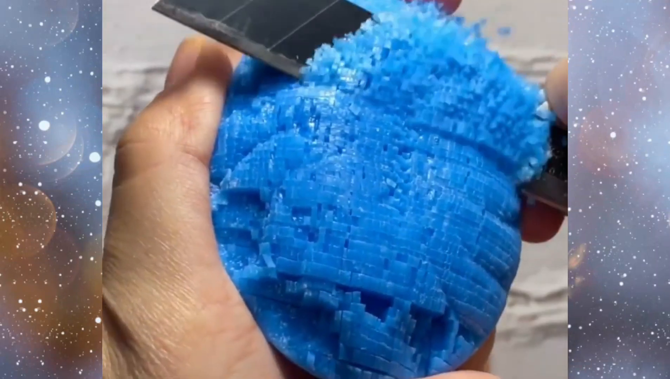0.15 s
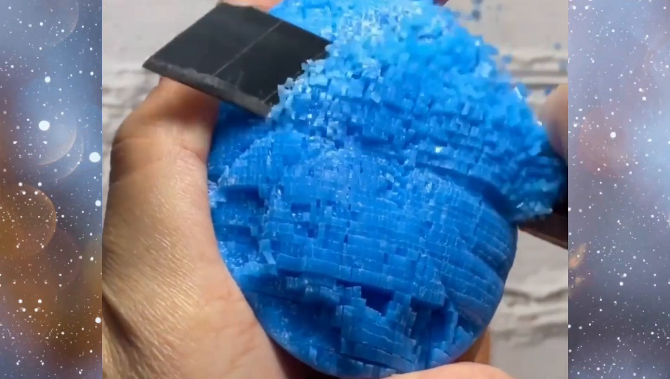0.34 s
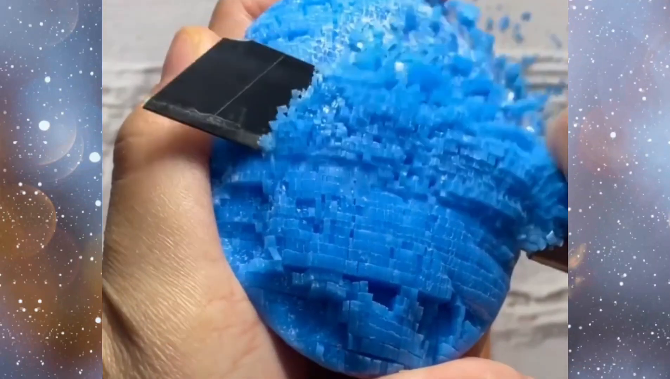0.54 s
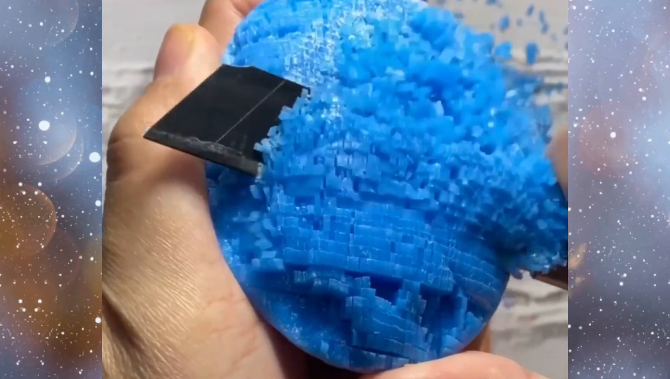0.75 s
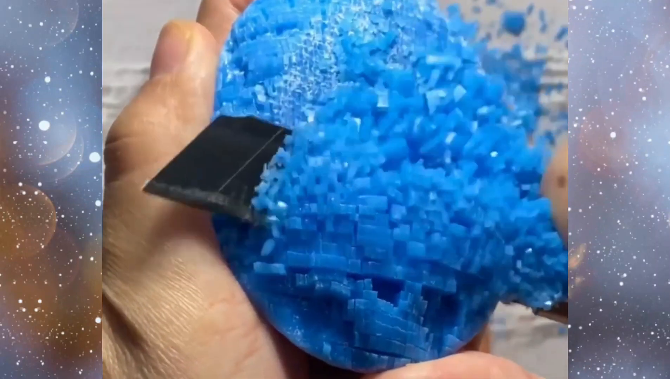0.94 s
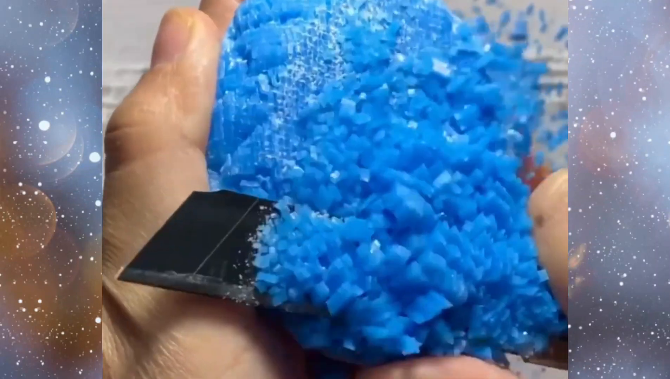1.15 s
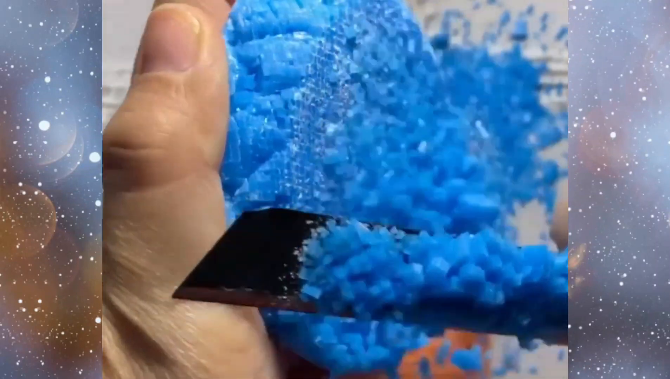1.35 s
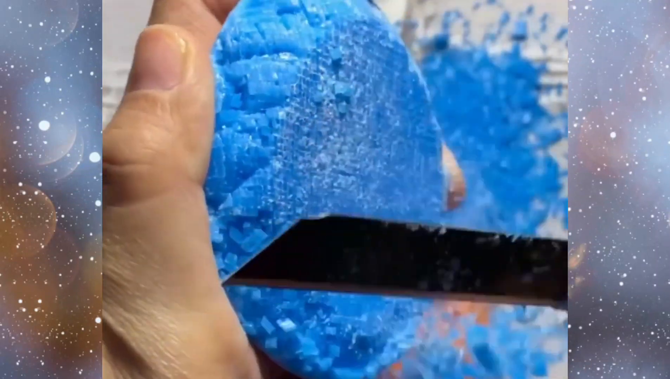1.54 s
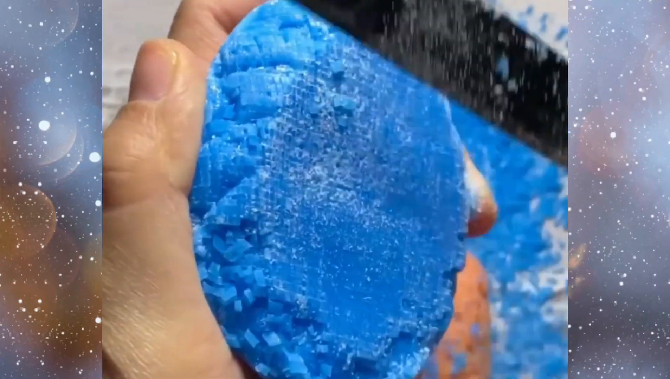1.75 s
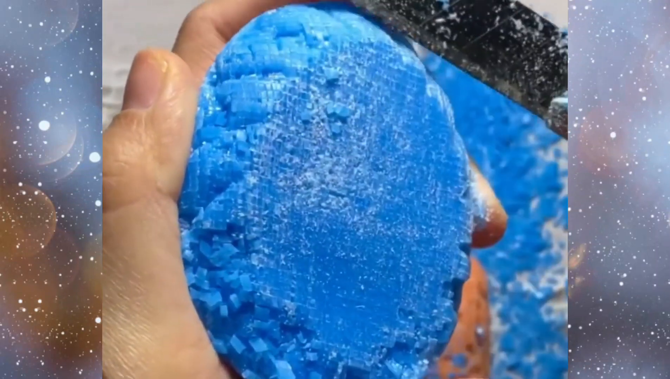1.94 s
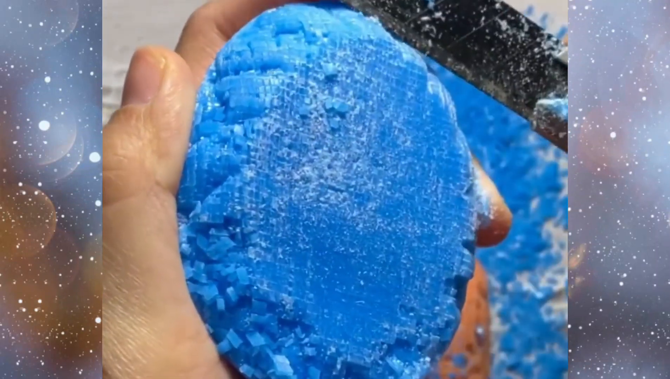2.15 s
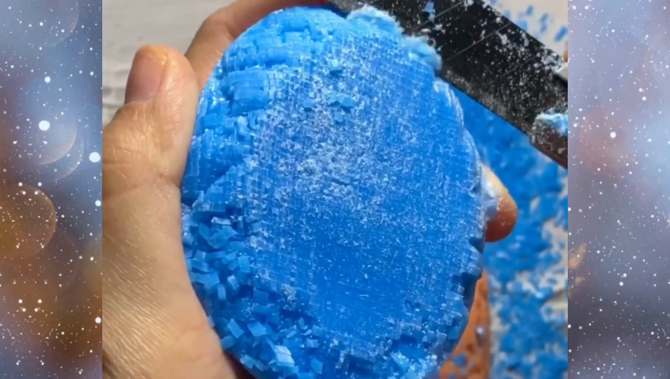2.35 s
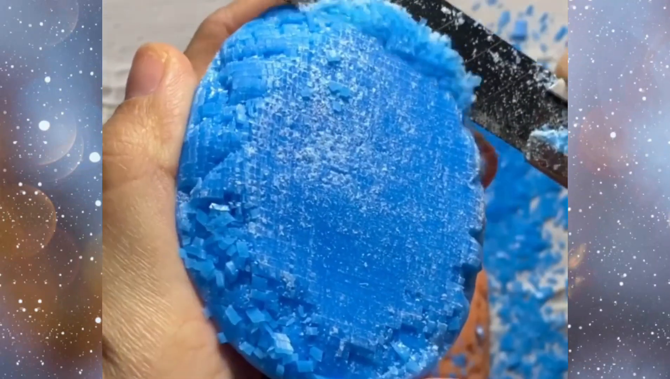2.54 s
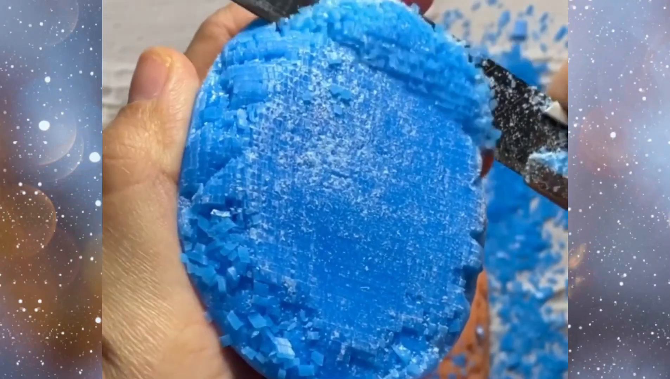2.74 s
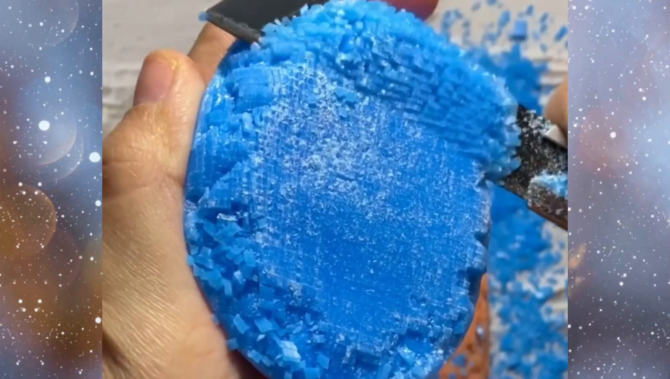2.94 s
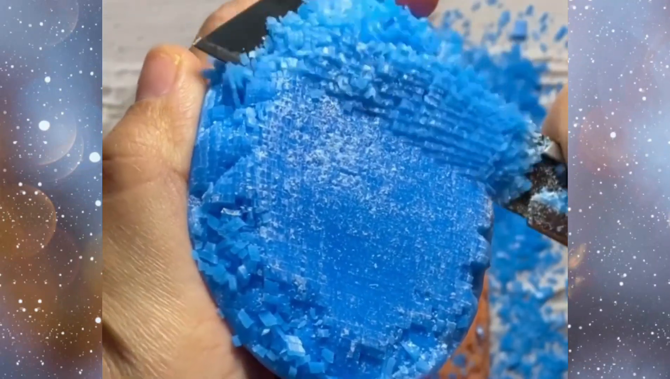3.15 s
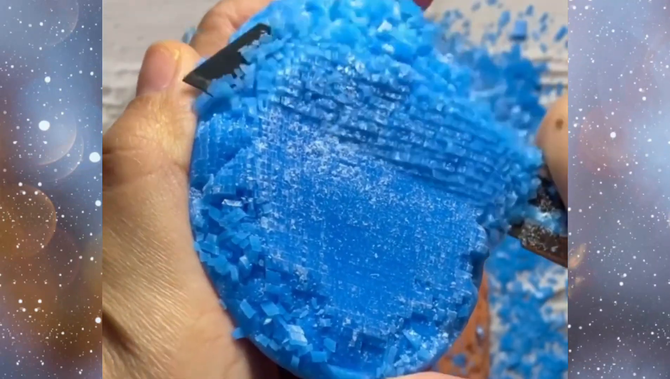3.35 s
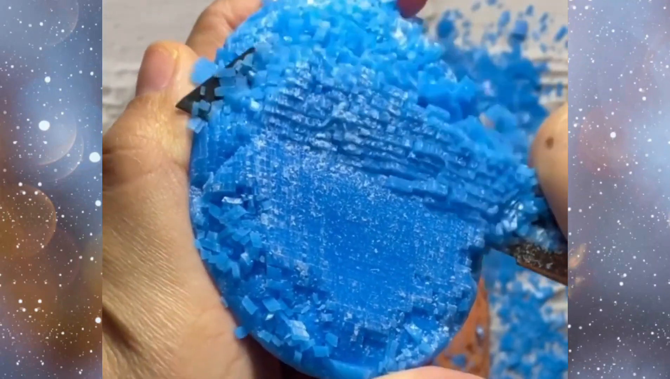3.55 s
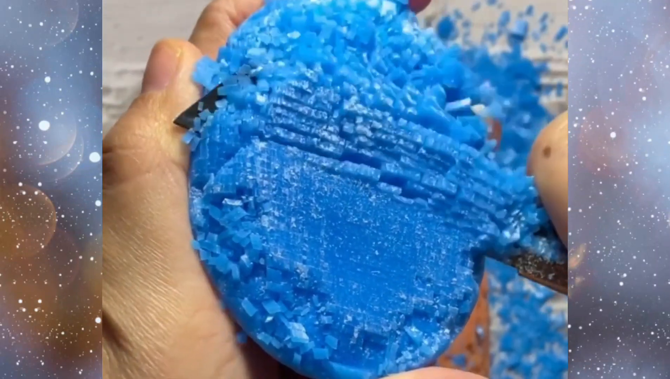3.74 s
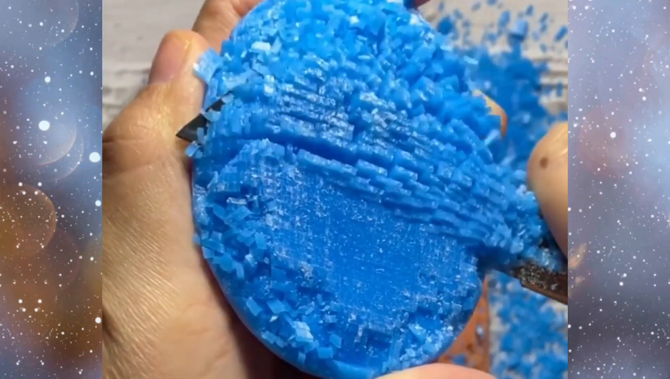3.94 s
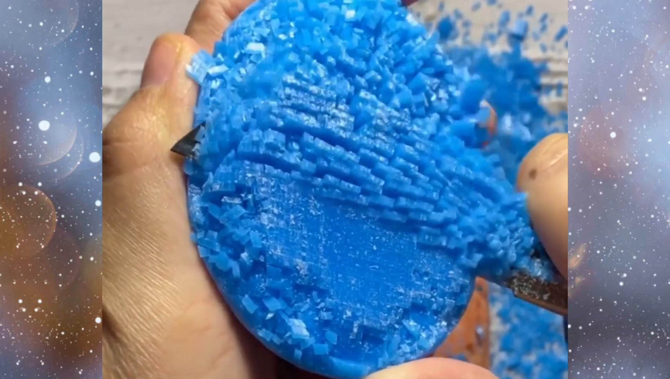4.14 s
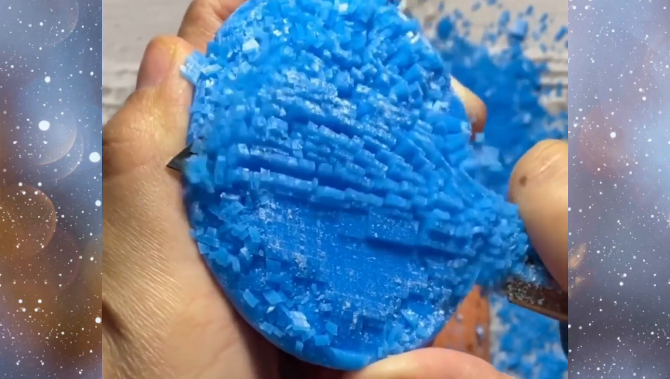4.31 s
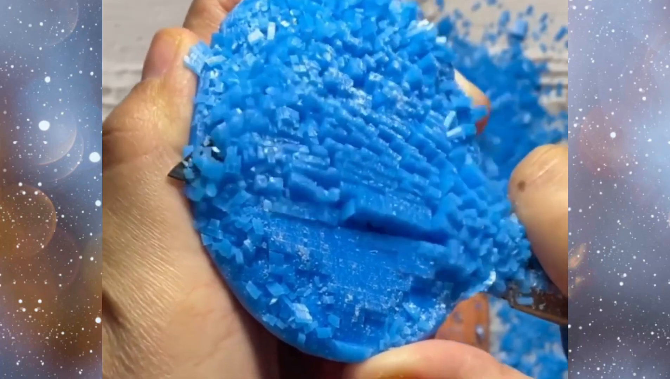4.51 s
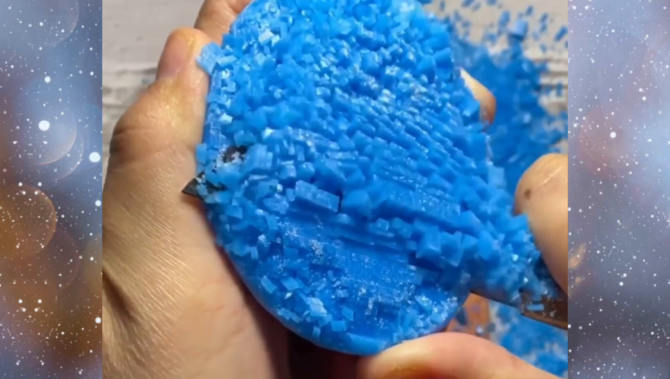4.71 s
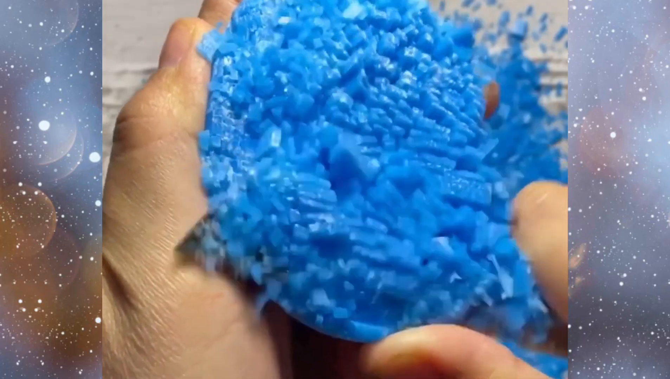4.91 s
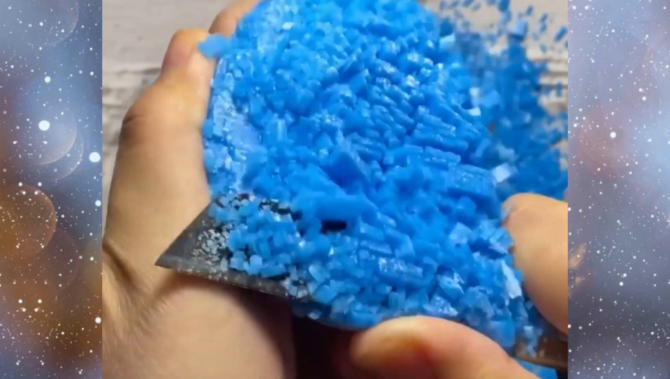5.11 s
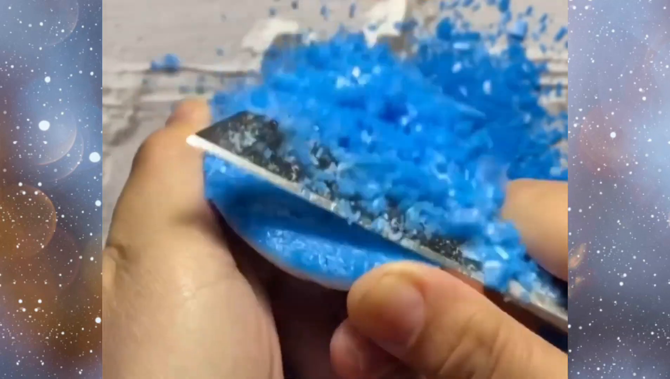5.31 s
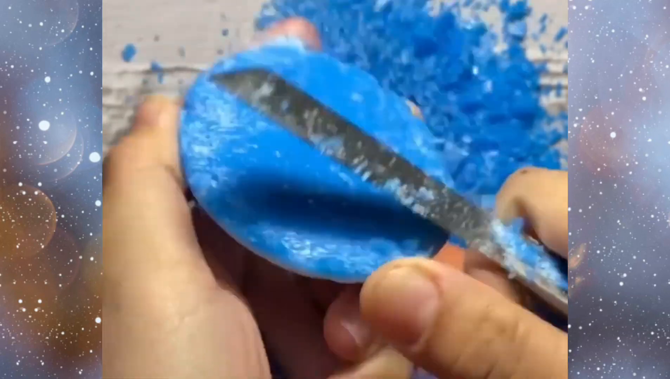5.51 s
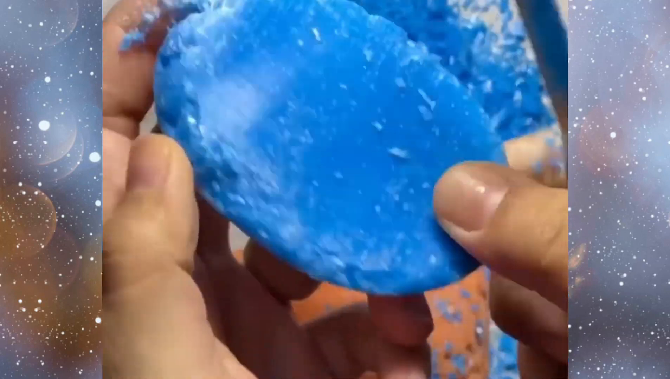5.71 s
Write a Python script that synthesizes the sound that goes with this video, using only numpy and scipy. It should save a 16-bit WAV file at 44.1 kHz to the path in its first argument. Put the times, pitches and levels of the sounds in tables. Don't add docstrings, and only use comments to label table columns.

```python
import sys
import numpy as np
from scipy import signal
from scipy.fft import rfft, irfft
from scipy.io import wavfile
from scipy.ndimage import uniform_filter1d

SR = 44100
rng = np.random.default_rng(int(sys.argv[2]) if len(sys.argv) > 2 else 0)


def log_audio(samples):
    frames = np.atleast_2d(samples).T
    limited = np.clip(frames, -1, 1)
    pcm = np.round(limited * 32767).astype(np.int16)
    wavfile.write(sys.argv[1], SR, pcm)


def voltage_ratio(level):
    return 10 ** (np.asarray(level, float) / 20)


N = 258867
TIME = np.arange(N) / SR
SPILL_MID_DB = -31
PLACE_SPREAD_DB = 7
KNOCK_LEFT_DB = 3.5


def evened(x):
    return x / np.sqrt(np.mean(x ** 2) + 1e-20)


def read(points, hz):
    f, value = np.transpose(points)
    return np.interp(np.log(hz + 1), np.log(f + 1), value)


def during(spans):
    sink_s = 0.09
    return sum(np.clip(np.minimum(TIME - start, end - TIME) / sink_s + .5, 0, 1) for start, end in spans)


def leaning(db):
    return voltage_ratio(np.array([[db], [-db]]) / 2)


def decaying(x, ms):
    return signal.lfilter([1], [1, -np.exp(-1000 / (ms * SR))], x)


def ring(x, hz, width):
    r = np.exp(-np.pi * width / SR)
    return 2 * signal.lfilter([1 - r], [1, -r * np.exp(2j * np.pi * hz / SR)], x + 1e-18).real


def resonate(x, hz, width):
    turn = np.exp(2j * np.pi * np.cumsum(hz) / SR)
    r = np.exp(-np.pi * width / SR)
    return 2 * (turn * signal.lfilter([1 - r], [1, -r], x / turn + 1e-18)).real


def body(x, modes):
    return sum((-1) ** k * voltage_ratio(db) * ring(x, hz, width) for k, (hz, width, db) in enumerate(modes))


# f/Hz, width/Hz, level/dB
MOTOR_LINES = [(61.05, 2.5, -53), (118.8, 8.1, -53), (191.4, 52, -53.5), (296.3, 13, -56)]
# f/Hz, density/dB
AIR_COLOUR = [(12, -69.5), (20, -53.5), (43, -16.5), (68, -14), (87, -21), (123, -12.5), (148, -18),
              (305, -23), (549, -21.5), (595, -26), (777, -21), (1300, -27), (2200, -30.5), (6940, -42.5),
              (11800, -60), (15400, -106), (22000, -120)]
# f/Hz, likeness/1
AIR_LIKENESS = [(30, 0.92), (120, 1), (250, 0.047), (1000, 0.053)]
# from/s, until/s
DIMMED = [
    (-.1, .3),
    (2.08, 3.15),
]


def room_air(spill_db):
    hz = np.fft.rfftfreq(N, 1 / SR)
    same = np.clip(read(AIR_LIKENESS, hz), 0, 1)
    left, other = rfft(rng.standard_normal((2, N)))
    right = same * left + np.sqrt(1 - same ** 2) * other
    air = irfft(np.array([left, right]) * voltage_ratio(read(AIR_COLOUR, hz)), N)
    air = voltage_ratio(-50) * evened(air) * leaning(2.4)
    air = air * voltage_ratio(-5.5 * np.exp(-((TIME - 2.33) / 0.15) ** 4))
    high_pass = signal.butter(4, 600, "high", fs=SR, output="sos")
    upper = signal.sosfilt(high_pass, air[:, ::-1])[:, ::-1]
    upper = signal.sosfilt(high_pass, upper)
    air = air - (1 - voltage_ratio(-9)) * during(DIMMED) * upper
    noise = rng.standard_normal(N)
    lines = sum(voltage_ratio(db) * evened(ring(ring(noise, f, width), f, width)) for f, width, db in MOTOR_LINES)
    swell_db = 9.5 + 0.084 * (uniform_filter1d(spill_db, SR // 8) - SPILL_MID_DB)
    return voltage_ratio(swell_db) * (air + lines * voltage_ratio(-5.5) * leaning(1.2))


# f/Hz, t60/s
NEAR_DECAY = [(500, 0.073), (2000, 0.075), (6000, 0.094), (12000, 0.051)]


def surfaces(x):
    taps = np.zeros((3, 4096))
    slots = np.arange(40, 4070, 12)
    at = slots + rng.integers(0, 12, (3, len(slots)))
    np.put_along_axis(taps, at, rng.choice([-1., 1.], at.shape), 1)
    hz, t, z = signal.stft(taps, SR, nperseg=64)
    apart = np.clip(hz / 7000, 0, 1)[:, None]
    z = np.sqrt(1 - apart ** 2) * z[0] + apart * z[1:]
    decay = voltage_ratio(-60 * t / read(NEAR_DECAY, hz)[:, None])
    tail = signal.istft(z * decay, SR, nperseg=64)[1]
    return signal.oaconvolve(x, tail / np.linalg.norm(tail[0]), axes=1)[:, :N]


# t/s, cutting level/dB, crumbs riding the blade level/dB, crumbs spilling level/dB, stick f/Hz
HAND_STROKES = [
    [(0.0, -20, -36, -32.5, 7700), (0.266, -24.5, -36, -36, 7600), (0.34, -11, -14.5, -28.5, 7250),
     (0.52, -8.5, -10, -28, 7340), (1.16, -15.5, -20.5, -22.5, 6840), (1.64, -12, -18, -22.5, 5370),
     (1.894, -13.5, -15.5, -25.5, 5750), (2.04, -31, -28, -38, 5630), (2.088, -43, -35.5, -68.5, 5570)],
    [(2.384, -70.5, -63, -69, 6960), (2.636, -25, -45, -33.5, 7070), (2.95, -19, -50, -39.5, 7800),
     (3.244, -15, -37, -30.5, 7300), (3.642, -16, -32.5, -29, 7760), (3.9, -26.5, -33, -31.5, 7250),
     (4.052, -23.5, -43, -35, 8300), (4.75, -33, -41, -39.5, 6320), (5.132, -23, -30, -28.5, 7070)],
    [(5.44, -23.5, -27, -31.5, 6530), (5.478, -15.5, -12.5, -32.5, 5720), (5.65, -16, -14.5, -30, 6720),
     (5.752, -26.5, -34, -31.5, 5900), (5.87, -32.5, -43, -42, 6200)],
]
# t/s, level change/dB, half length/s
STROKE_WAVERS = [(0.247, -1, 0.0059), (0.94, -5, 0.081), (1.12, -8.5, 0.025), (2.233, -8.5, 0.19),
                 (1.309, -10.5, 0.16), (1.521, -8.5, 0.1), (2.669, -18, 0.037), (2.822, -4, 0.024),
                 (3.889, -10, 0.0075), (4.711, -15, 0.043), (4.855, -3.5, 0.053), (4.596, -9, 0.012),
                 (4.902, -14, 0.021), (5.187, -4, 0.013), (5.44, 5, 0.013), (5.253, -9.5, 0.13),
                 (5.459, -11.5, 0.041),
                 (0.108, 1, 0.0095), (0.134, -16, 0.01), (0.195, -3.5, 0.0057), (0.276, -4, .009),
            (0.303, 10, 0.0045), (0.332, 2.5, 0.0066), (0.341, 2, 0.0041), (0.366, -9, 0.0086),
            (0.407, -9, 0.0074), (0.422, -11, 0.0072), (0.447, -2.5, 0.0051), (0.563, -6.5, .008),
            (0.622, -4.5, 0.013), (1.535, 2.5, 0.011), (1.982, -4.5, 0.011), (2.973, -1.5, .008),
            (3.001, -8, .009), (3.02, -12, 0.0046), (4.404, -3, 0.015), (4.469, -3.5, 0.015),
            (5.33, -5.5, 0.017), (5.523, -3.5, 0.0085)]


def controls():
    columns = np.transpose(sum(HAND_STROKES, []))
    force_db, heap_db, spill_db, hz = (np.interp(TIME, columns[0], c) for c in columns[1:])
    halt_db = sum(db * np.maximum(1 - abs(TIME - s) / half_s, 0) for s, db, half_s in STROKE_WAVERS)
    return force_db + halt_db, heap_db + halt_db, spill_db + halt_db, hz


# from/s, until/s
SKIM_SPANS = [
    (-.1, 0.33),
    (2.5, 3.15),
]


def skimming():
    return during(SKIM_SPANS)


# t/s, level/dB, f/Hz, knock level/dB
CHUNKS = [(0.3406, -24, 3600, -32), (0.373, -11.5, 3660, -24), (0.4525, -2.5, 3660, -46),
          (0.5055, -5, 3320, -35), (0.6273, -1, 3650, -44), (0.6951, -3.5, 3620, -42),
          (0.8804, -4, 2630, -41.5), (0.9363, 1.5, 3480, -44), (0.9532, -4, 3420, -9),
          (0.996, -1.5, 2750, -22), (1.0575, -11, 3450, -12), (1.1159, -5, 3040, -24),
          (1.2406, -8, 2590, -36), (1.268, -8, 3630, -22), (1.3254, -5.5, 2670, -22),
          (1.362, -7, 3550, -29), (1.4063, -2, 2700, -50.5), (1.5399, -3.5, 2740, -21.5),
          (1.6018, -5.5, 3680, -11), (1.654, -10, 3650, -2.5), (1.8692, -6.5, 3740, -24.5),
          (1.926, -17, 3670, -41.5), (1.9924, -9.5, 2490, -23), (2.0278, -15, 2680, -20),
          (2.1403, -38, 3970, -33), (2.2395, -25, 1890, -40),
          (2.436, -34.5, 1740, -28), (2.494, -16, 2660, -23), (3.602, -9.5, 2940, -13),
                 (3.846, -6, 2650, -18), (3.9349, 2.5, 2660, -17), (3.998, -12.5, 2540, -11.5),
                 (4.033, -9, 2080, -25), (4.216, -18, 1970, -26), (4.3757, -8.5, 2893, -15),
                 (4.5196, -10, 1990, -8), (4.6158, -10, 1810, -12), (4.742, -21, 3000, -31),
                 (4.7531, -7.5, 3430, -6), (4.8517, -13.5, 3600, -12), (4.923, -19, 3520, -6),
                 (4.9593, -27, 3700, 0), (4.9769, -12, 3940, -14), (5.111, -4.5, 2690, -18.5),
                 (5.1413, -2, 4000, -19), (5.1921, -11, 1950, -10), (5.3025, -8.5, 3640, -15.5),
                 (5.362, -19, 4100, -1), (5.4155, -17.5, 4300, -14), (5.48, -12, 3950, -27),
                 (5.544, -1.5, 3670, -21.5), (5.7235, -10, 1280, -1), (5.732, -8, 1090, -6),
                 (5.8552, -13, 2620, -16),
          (2.091, -35, 2700, -25), (2.108, -33, 2720, -31), (3.81, -25.5, 2520, -21),
                  (3.8268, -17, 2600, -13), (3.9562, -18, 2200, -27.5), (4.0604, -17, 2490, -12),
                  (4.1346, -13.5, 2640, -11.5), (4.1594, -16, 1900, -11), (4.1762, -16, 1920, -8),
                  (4.2435, -24, 1950, -32), (4.2836, -25, 1930, -24), (4.3344, -30, 1900, -19),
                  (4.4264, -17.5, 2570, -6.5), (4.45, -17, 2020, -22), (4.5103, -12, 2090, -12.5),
                  (4.534, -10.5, 1900, -15), (4.553, -13, 2570, -15), (4.6362, -20.5, 1840, -5),
                  (4.6673, -17, 1950, -9), (4.7845, -27, 1930, -11), (4.8065, -18, 1980, -13),
                  (4.9886, -25, 1890, -9), (5.0312, -33, 4400, -10), (5.0394, -18.5, 2330, -8),
                  (5.309, -10, 1950, -12), (5.3446, -20, 3970, -8), (5.3728, -8.5, 4500, -31),
                  (5.386, -9, 2320, -17), (5.4865, -9.5, 3900, -19.5), (5.5013, -22, 4070, -24),
                  (5.5238, -9.5, 3860, -28), (5.6568, -18.5, 4230, 7.5), (5.668, -17, 3700, 6),
                  (5.7582, -23, 1630, 1)]


def all_chunks():
    return CHUNKS


# t/s,
# level/dB, f/Hz
STICK_SNAPS = [(0.0047, -6, 7900), (0.0128, -11, 7900), (0.0477, -6, 7620), (0.0535, -12, 7600),
               (0.0862, -14, 8120), (0.09, -13, 7900), (0.101, -5, 7490), (0.1136, -9, 7900),
               (0.1216, -9, 7850), (0.1306, 0, 7600), (0.1335, -8, 8000), (0.1525, -12, 7500),
               (0.1598, -5, 7700), (0.1742, -4, 7950), (0.184, -9, 8300), (0.203, 0, 8200), (0.21, -8, 8000),
               (0.2152, -4, 8000), (0.2245, -8, 7400), (0.2452, -2, 8490), (0.2555, 0, 7600),
               (0.26, -1, 7100), (0.2812, -3, 8320), (0.2875, -2, 7100), (0.301, -5, 7100),
               (0.3085, -1, 7430), (0.322, -2, 7600), (0.331, -6, 7000),
               (0.42, 1.5, 6600), (0.46, 2, 6300), (0.5177, 9, 7100), (0.599, -2, 7760), (0.961, 2, 6400),
               (0.9996, 3, 8900), (1.1427, -7, 6500), (1.1644, 2, 8000), (1.361, -9, 5730),
               (1.429, -1, 5170), (1.556, -3.5, 5630), (1.6021, 3.5, 5460), (1.8596, -13.5, 5860),
               (1.9919, -5, 6050), (2.141, -18.5, 5200),
               (2.2385, -33, 7300), (2.388, -43, 6820), (2.434, -32, 6810), (2.4673, -35, 7330),
              (2.4748, -33, 7200), (2.497, -17.5, 6960), (2.5166, -30, 7900), (2.5305, -16.5, 7600),
              (2.5536, -11, 7460), (2.5826, -13, 7800), (2.5944, -19, 7960), (2.61, -21, 8040),
              (2.6284, -30, 8150), (2.638, -17, 8000), (2.649, -13, 7400), (2.6756, -20, 7550),
              (2.6986, -15, 7400), (2.708, -7, 7600), (2.7123, -8, 7400), (2.745, -7, 6800),
              (2.76, -7, 8000), (2.7813, -10, 7860), (2.8117, -6.5, 8050), (2.82, -9, 8000),
              (2.835, -12, 8040), (2.863, -8.5, 7340), (2.8806, -14, 8200), (2.9045, -7, 7660),
              (2.913, -16, 8070), (2.9226, -6.5, 7800), (2.9593, -17.5, 7200), (2.969, -10, 7360),
              (2.985, -4, 8100), (3.0117, -5, 8100), (3.023, -4.5, 8530), (3.044, -17, 7550),
              (3.0671, -20, 7340), (3.0914, -6, 7460), (3.1634, -4, 7400), (3.1897, -4.5, 7250),
              (3.307, -14.5, 7210), (3.6172, -11, 8180), (3.6826, -9, 8050), (3.7934, -7.5, 8040),
              (3.8046, -19, 8140), (3.825, -8, 8250), (3.8408, -11.5, 8300),
               (3.8697, -11, 6000), (3.902, -12.5, 7050), (3.9268, -10, 7950), (3.996, -15, 7300),
                 (4.02, -24, 7870), (4.0328, -13, 5800), (4.0472, -16, 7550), (4.0743, -12, 8000),
                 (4.0858, -9, 8500), (4.1037, -5, 8700), (4.1546, -13, 7270), (4.162, -7, 8700),
                 (4.194, -9, 8600), (4.2125, -6, 8400), (4.258, -13, 8000), (4.2898, -7.5, 8800),
                 (4.311, -4, 7700), (4.345, -12, 8000), (4.356, -10, 5860), (4.3833, -8.5, 8400),
                 (4.4125, -1, 8600), (4.52, -0.5, 5990), (4.541, -9, 5640), (4.5762, -13.5, 7900),
                 (4.6025, -10, 7900), (4.65, -31, 6070), (4.6677, -14.5, 5940), (4.7155, -18, 6700),
                 (4.743, -9.5, 7200), (4.759, -18, 7850), (4.7952, -29, 7900), (4.8446, -26.5, 6120),
                 (4.8738, -14.5, 7760), (4.8955, -6, 7800), (4.9155, -11, 5700), (4.9568, -6, 8200),
                 (4.977, -19, 5970), (5.0286, -9, 6120), (5.0403, -1.5, 8150), (5.0643, -4, 6300),
                 (5.0762, -5, 6540), (5.1098, -2, 6050), (5.127, -2.5, 7750), (5.193, -28, 9300),
                 (5.26, -15.5, 7840), (5.3018, -13, 7740), (5.3025, -6.5, 5700), (5.343, -15, 6400),
                 (5.361, -13.5, 6950), (5.4129, -3.5, 7050), (5.4417, -18.5, 6230), (5.4798, -1, 5270),
                 (5.5163, -6, 6430), (5.544, -5.5, 7100),
               (1.218, -7, 6160), (1.242, -18, 5250), (1.2526, -13, 5600), (1.269, -10, 7000),
               (1.3346, -5, 5650), (1.382, -21, 5290), (1.4355, -10, 6540), (1.4446, -10.5, 5100),
               (2.8991, -9, 8470), (2.915, -5.5, 8230), (2.9364, -13, 8260), (3.0124, -9, 8060),
               (3.032, -18.5, 7600), (3.0562, -18, 7430), (3.079, -9, 8090), (3.0949, -6, 7500),
               (3.8691, -14, 6080), (3.9454, -18, 8050), (3.9614, -14.5, 6630), (4.7048, -13.5, 6700),
               (5.0884, -8.5, 6200), (5.1204, -7, 7330), (5.1414, -9, 7000), (5.1564, -14, 7150)]


def all_snaps():
    return STICK_SNAPS


def clumping(fast_ms, slow_ms):
    def smooth(v, ms):
        return evened(decaying(v, ms))
    fast, slow = rng.standard_normal((2, N))
    fast = smooth(smooth(fast, fast_ms), fast_ms)
    slow = smooth(smooth(slow, slow_ms), slow_ms)
    return evened(fast + .7 * slow)


def blip(hz, cycles, pan_db, lag_s, phase):
    bend = 1 + 0.29 * np.clip(hz / 4000 - 1, 0, 1)
    late_s = -0.000023 * bend + lag_s
    t = np.arange(700) / SR - np.array([[1], [-1]]) * late_s / 2 - 1e-4
    u = np.maximum(t, 0) * hz / cycles
    tone = u ** 2.21 * np.exp(-8.0 * u) * np.sin(2 * np.pi * hz * t + phase)
    return leaning(pan_db) * tone / abs(tone).max()


def grains(kind, level_db, clump, count=10):
    lo_hz, hi_hz, cycles, per_s, spread_db, common = kind
    chance, size = rng.random(N), rng.exponential(1, N)
    pan, lag, phase = rng.standard_normal((3, count))
    which = rng.integers(0, count, N)
    density = voltage_ratio(.5 * np.maximum(level_db - level_db.max(), -22)) * np.exp(0.31 * common * clump)
    train = voltage_ratio(spread_db * np.minimum(size, 5) + 0.71 * common * clump) * (chance < per_s * density / SR)
    train /= np.sqrt(uniform_filter1d(train ** 2, SR // 6) + 0.00105)
    out = np.zeros((2, N))
    for k, hz in enumerate(np.geomspace(lo_hz, hi_hz, count)):
        snap = blip(hz, cycles, 5 * (pan[k] - pan.mean()), 2e-5 * lag[k], 3 * phase[k])
        out += signal.oaconvolve((train * (which == k))[None], snap, axes=1)[:, :N]
    return out


def shower(events, under_db, rise_ms, die_ms):
    kicks = np.zeros(N)
    for s, db, *_ in events:
        kicks[round(s * SR)] += voltage_ratio(min(db, 2) + under_db)
    before = decaying(kicks[::-1], rise_ms)[::-1]
    return before + decaying(kicks, die_ms) - kicks


def chunk_spray():
    return shower(all_chunks(), -14.0, rise_ms=0.42, die_ms=0.98)


# lowest f/Hz, highest f/Hz, length/cycles, rate/Hz, size spread/dB, shared clumping/1
KNOCK_GRAINS = (674, 1320, 5.2, 670, 2.6, 0.58)
# f/Hz, width/Hz, level/dB
BAR_RINGS = [(845, 300, 5.2), (425, 32, 7.2), (1660, 570, 8.2)]


def bar_knocks(spill_db, clump):
    turn_s, rise_s, fall_s = 5.72, 0.2, 0.11
    turn = voltage_ratio(-28.5) * np.exp(-((TIME - turn_s) / np.where(TIME < turn_s, rise_s, fall_s)) ** 2)
    cutting = voltage_ratio(-41.5 + 0.85 * (spill_db - SPILL_MID_DB) - 12 * skimming())
    level = cutting + turn
    knocks = evened(body(grains(KNOCK_GRAINS, 20 * np.log10(level), clump), BAR_RINGS))
    return (level + 0.015 * chunk_spray()) * leaning(KNOCK_LEFT_DB) * knocks


# lowest f/Hz, highest f/Hz, length/cycles, rate/Hz, size spread/dB, shared clumping/1
PATTER_GRAINS = (1060, 2210, 0.95, 1800, 3.33, 0.97)
# f/Hz, width/Hz, level/dB
TABLE_RINGS = [(1950, 750, 1.65), (2704, 435, 9)]


def table_patter(spill_db, clump):
    patter = grains(PATTER_GRAINS, spill_db, clump)
    dull = .65 * skimming()
    patter = (1 - dull) * evened(body(patter, TABLE_RINGS)) + dull * evened(body(patter, TABLE_RINGS[:1]))
    return (voltage_ratio(spill_db - 3.0) + 1.1 * chunk_spray()) * patter


# lowest f/Hz, highest f/Hz, length/cycles, rate/Hz, size spread/dB, shared clumping/1
RATTLE_GRAINS = (2726, 5030, 6.6, 2200, 2.9, 0.99)
# f/Hz, width/Hz, level/dB
BLADE_RINGS = [(2600, 1400, -6), (4380, 290, -6), (3480, 650, -12.5)]
# t/s, f/Hz
BLADE_PITCH = [(.3, 3575), (1.0, 3520), (2.0, 3810), (2.4, 2980), (2.62, 2960), (3.2, 3460), (5.4, 3760),
               (5.5, 3870), (5.7, 3830)]
# from/s, until/s
LIFTED = [
    (2.08, 2.42),
]
# from/s, until/s
HEAPED = [
    (1.5, 2.1),
    (5.5, 7),
]


def blade_rattle(heap_db, clump):
    rattle = grains(RATTLE_GRAINS, heap_db, clump)
    damp = .3 * during(HEAPED)
    sung = evened(resonate(rattle, np.interp(TIME, *np.transpose(BLADE_PITCH)), 380))
    spread = evened(body(rattle, BLADE_RINGS))
    rattle = voltage_ratio(2) * (1 - during(LIFTED) - damp) * sung + (0.45 + damp) * spread
    on_blade = [c for c in all_chunks() if c[2] > 2900]
    struck = shower(on_blade, -15.0, rise_ms=0.56, die_ms=2.1)
    scrape = voltage_ratio(-44) * np.exp(-((TIME - 2.54) / 0.027) ** 4)
    return (voltage_ratio(heap_db - 5.5) + 2.0 * struck + scrape) * rattle


# lowest f/Hz, highest f/Hz, length/cycles, rate/Hz, size spread/dB, shared clumping/1
STICK_GRAINS = (5110, 15200, 3.65, 4400, 3, 1)
# lowest f/Hz, highest f/Hz, length/cycles, rate/Hz, size spread/dB, shared clumping/1
DUST_GRAINS = (3470, 15700, 2.1, 9000, 0.8, .8)
# f/Hz, level/dB
DUST_TINT = [(3500, -9.5), (4700, -6.5), (5300, -3), (6300, -7), (8500, 1), (9900, 6.5), (10700, 4),
             (11600, -12.5)]


def stick_crackle(force_db, stick_hz, clump):
    skim = skimming()
    sticks = grains(STICK_GRAINS, force_db, clump, count=12)
    sticks = resonate(resonate(sticks, stick_hz, 3550), stick_hz, 3360)
    narrow = evened(resonate(sticks, stick_hz, 1700))
    sticks = evened(sticks) + 0.82 * (skim + .5 * during(DEEP_SPANS[1:])) * narrow
    tint = voltage_ratio(read(DUST_TINT, np.fft.rfftfreq(N, 1 / SR)))
    dust = evened(irfft(rfft(grains(DUST_GRAINS, force_db, clump, count=12)) * tint, N))
    dust_db = -1.5 - 0.16 * (force_db + 26) - 8 * skim
    spray = shower(all_snaps(), -19.0, rise_ms=0.33, die_ms=5.7)
    return (voltage_ratio(force_db - 3.0 - 2 * skim) + spray) * (sticks + voltage_ratio(dust_db) * dust)


def shaving(force_db, heap_db, spill_db, stick_hz):
    clump = clumping(fast_ms=1.4, slow_ms=9.2)
    low = bar_knocks(spill_db, clump) + table_patter(spill_db, clump)
    return low + blade_rattle(heap_db, clump) + stick_crackle(force_db, stick_hz, clump)


def swell(ms):
    u = np.arange(240) * 1000 / (ms * SR)
    return u ** 2 * np.exp(2 - u) / 4


def splinter(sound):
    noise = rng.standard_normal(240)
    run = swell(.27) * noise * abs(noise)
    run[0] = .4
    out = signal.fftconvolve(sound, run[None], axes=1)[:, :700]
    return out * abs(sound).max() / abs(out).max()


# from/s, until/s
DEEP_SPANS = [
    (.33, 2.0),
    (3.2, 3.85),
]


def rows(force_db, hz):
    force_db = force_db - 60 * (1 - during(DEEP_SPANS))
    rows_per_s, jitter = 75, 0.61
    at = np.cumsum(np.exp(jitter * rng.standard_normal(600)) * SR / rows_per_s).astype(int)
    out = np.zeros((2, N + 700))
    for i in at[at < N]:
        size, tune, place, phase = rng.standard_normal(4)
        snap = splinter(blip(hz[i] * np.exp(0.13 * tune), 8.2, PLACE_SPREAD_DB * place, 0, 3 * phase))
        out[:, i:i + 700] += voltage_ratio(min(force_db[i] + 7.5 + 3.5 * size, 0)) * snap
    return out[:, :N]


def stick_snap(hz):
    lag, phase, tune, phase_2, place = rng.standard_normal(5)
    pan_db = PLACE_SPREAD_DB * place
    first = blip(hz, 7.3, pan_db, 1e-5 * lag, 3 * phase)
    second = blip(hz * np.exp(0.083 * tune), 4.0, pan_db, 1e-5 * lag, 3 * phase_2)
    pair = splinter(first + 1.52 * second)
    return pair / abs(pair.mean(0)).max()


def chunk_crack(hz, knock_db):
    lag, phase, tune, phase_2, place = rng.standard_normal(5)
    pan_db = 1.07 * PLACE_SPREAD_DB * place
    first = blip(hz, 6.4, pan_db, 2e-5 * lag, 3 * phase)
    second = blip(np.sqrt(2400 * hz) * np.exp(0.039 * tune), 1.4, pan_db, 2e-5 * lag, 3 * phase_2)
    knock = voltage_ratio(knock_db + 4.5) * blip(815, 4.9, pan_db + KNOCK_LEFT_DB, 0, 0)
    burst = swell(.6) * rng.standard_normal(240)
    crunch = signal.fftconvolve(blip(5060, 1.0, pan_db, 0, 0), burst[None], axes=1)[:, :700]
    return splinter(first + 0.18 * second) + crunch / abs(crunch).max() + knock


def cracks():
    out = np.zeros((2, N + 700))

    def place(s, sound):
        out[:, round(s * SR):][:, :700] += sound
    for s, db, hz in all_snaps():
        place(s, voltage_ratio(min(db, 2)) * stick_snap(hz))
    for s, db, hz, knock_db in all_chunks():
        place(s, voltage_ratio(db - 6.5) * chunk_crack(hz, knock_db))
    place(5.122, voltage_ratio(-18.5) * blip(403, 3.0, 0, 0, 0))
    return out[:, :N]


# f/Hz, level/dB
HAND_COLOUR = [(1300, -0.5), (1800, 2.5), (4300, -1), (4850, -3.5), (5300, -2), (6350, -1), (6900, -3),
               (7450, 0)]


def cupped(soap):
    high_pass = signal.butter(6, 1750, "high", fs=SR, output="sos")
    thin = signal.sosfilt(high_pass, soap)
    soap = soap + 0.98 * skimming() * (thin - soap)
    grid = np.linspace(0, SR / 2, 513)
    tint = signal.firwin2(513, grid, voltage_ratio(read(HAND_COLOUR, grid)), fs=SR)
    return signal.oaconvolve(soap, tint[None], "same")


def scene():
    force_db, heap_db, spill_db, hz = controls()
    air = room_air(spill_db)
    soap = cupped(shaving(force_db, heap_db, spill_db, hz) + rows(force_db, hz) + cracks())
    return air + voltage_ratio(-10.5) * surfaces(soap) + soap


def top_cut(x):
    return signal.sosfilt(signal.butter(12, 11990, fs=SR, output="sos"), x)


def record(dry):
    band = signal.firwin(801, 11790, window=("kaiser", 9), fs=SR)
    limited = signal.oaconvolve(dry, band[None], "same")
    return top_cut(np.clip(limited, -1, 1))


dry = scene()
out = record(dry)
log_audio(out)
```